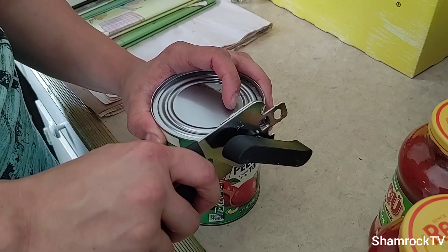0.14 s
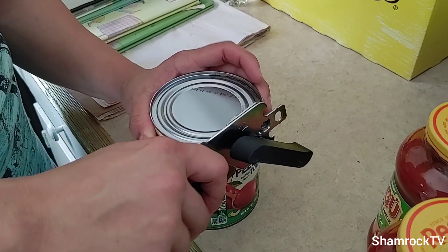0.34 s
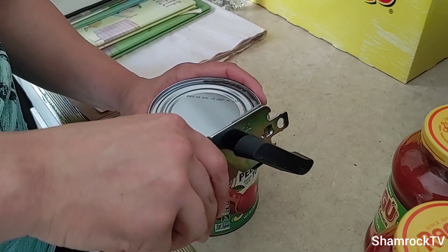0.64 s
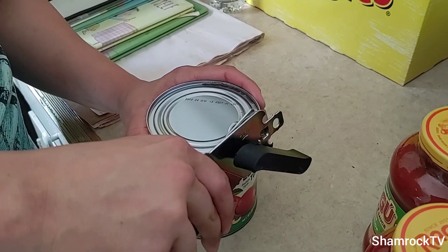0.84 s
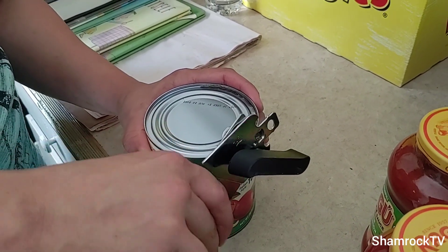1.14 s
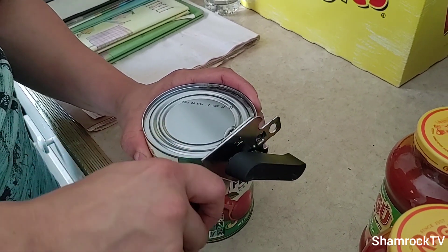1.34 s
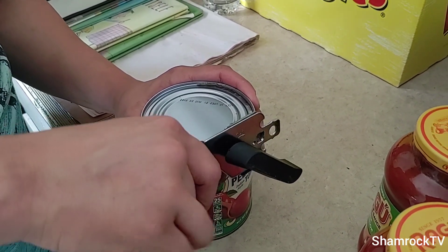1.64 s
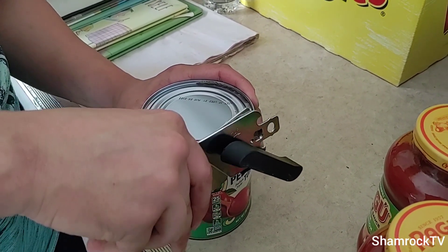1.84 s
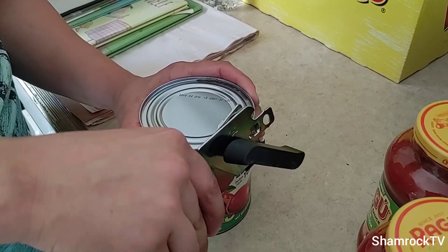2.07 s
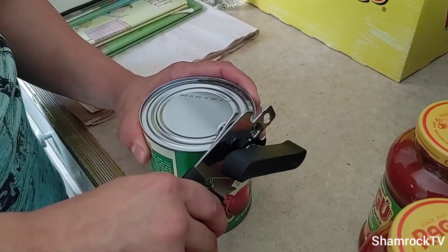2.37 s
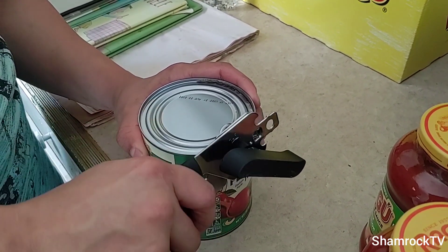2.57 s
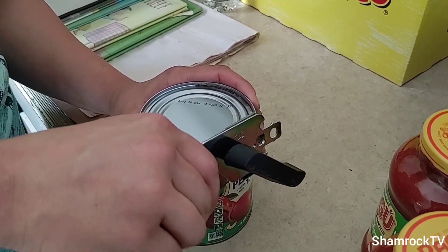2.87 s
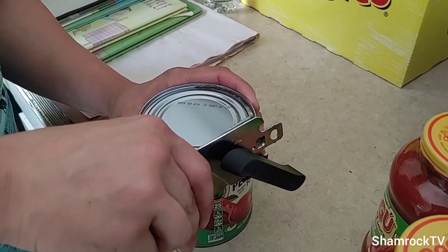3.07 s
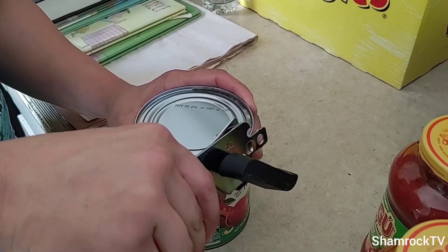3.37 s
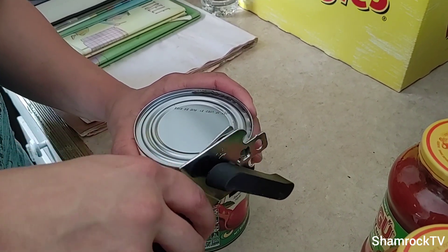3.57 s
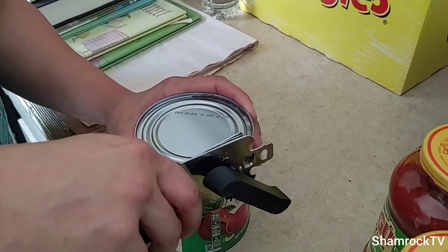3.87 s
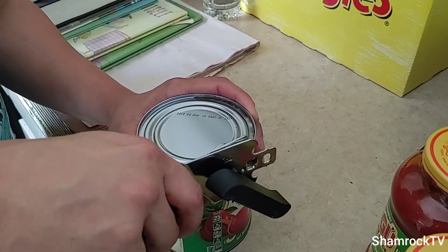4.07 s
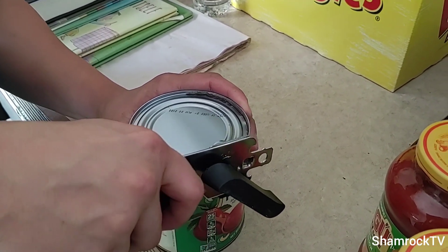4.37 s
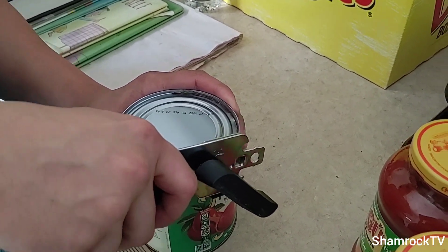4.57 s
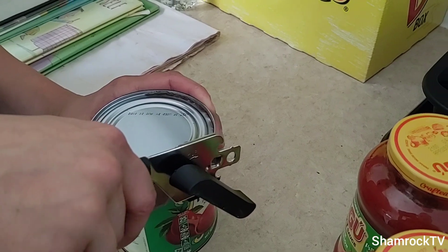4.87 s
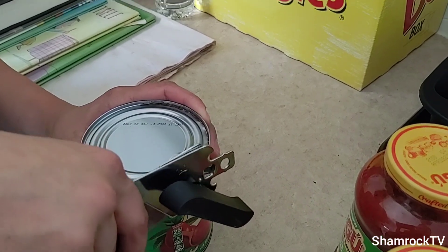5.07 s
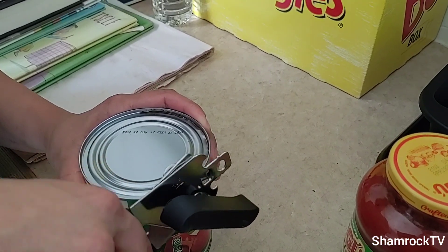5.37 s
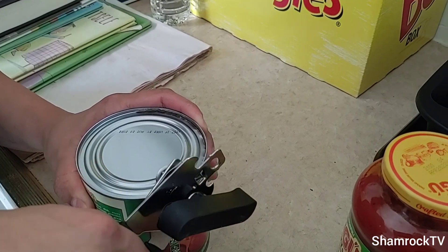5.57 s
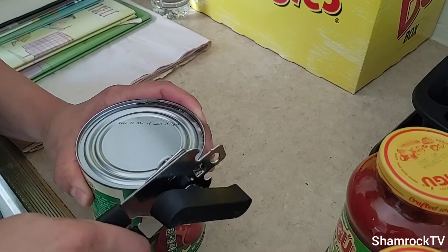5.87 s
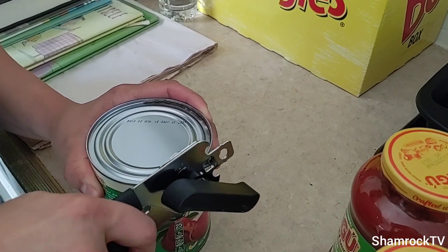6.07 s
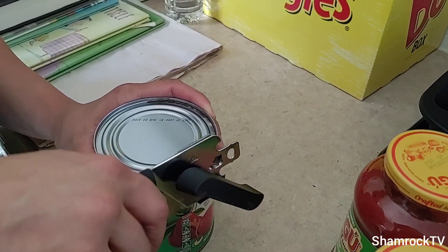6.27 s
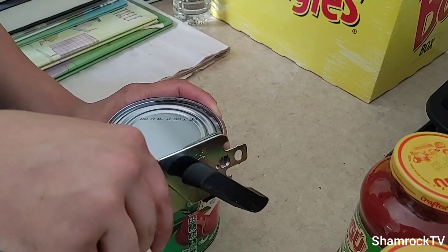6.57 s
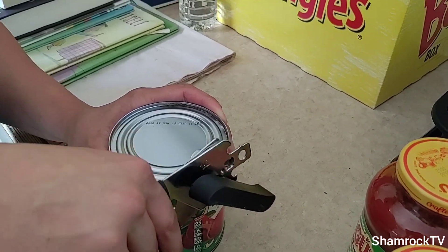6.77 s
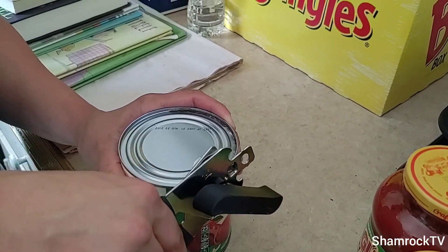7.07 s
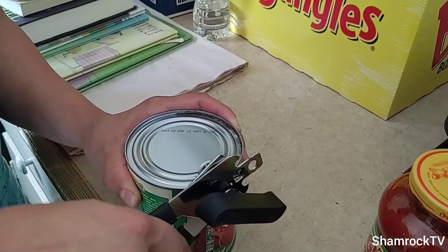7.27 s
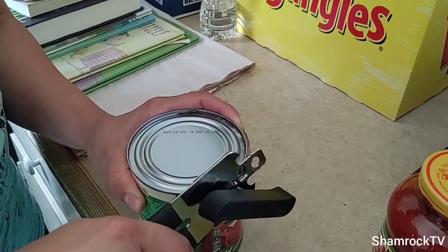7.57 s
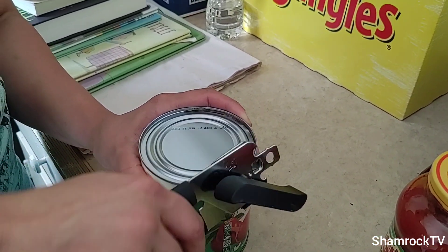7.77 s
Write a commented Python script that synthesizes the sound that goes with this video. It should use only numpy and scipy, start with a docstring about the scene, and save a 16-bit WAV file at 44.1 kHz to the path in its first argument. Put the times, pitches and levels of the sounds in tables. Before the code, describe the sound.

Close stereo pickup of a manual can opener on a full tin in a quiet kitchen. Small metal ticks and grainy scrapes come with each wrist turn; then a loud snap with a short crunch of tearing tin, followed by three more strong snaps almost two seconds apart. The can drops back with dull thuds. Two thin squeaks rise, and a faint hum lies underneath.

```python
"""Hand can opener on a full tin

A hand can opener is cranked round a full tin on a kitchen counter, heard close up over a humming appliance.
Snaps, ticks and landings are noise bursts that ring the modes of the can and echo in the room; thumps are decaying sines.
Wheel and fingers rub as grainy noise under bell-shaped swells, the first snap tears on as coarse noise,
and two thin squeaks are gliding sine partials. Air is shaped noise; hum and whine are unsteady sines."""
import sys
import numpy as np
from scipy import signal
from scipy.fft import rfft, irfft, next_fast_len
from scipy.io import wavfile
from scipy.ndimage import map_coordinates

SR = 44100
rng = np.random.default_rng(int(sys.argv[2]) if len(sys.argv) > 2 else 0)


def materialize(psi):
    """Save the field psi as 16-bit PCM at rate SR to the path in sys.argv[1].

    A 1-D psi becomes a single channel; in a 2-D psi each row is a channel.
    """
    bounded = np.clip(np.atleast_2d(psi).T, -1, 1)
    quanta = np.round(bounded * 32767).astype(np.int16)
    wavfile.write(sys.argv[1], SR, quanta)


N = 349272


def amp(db):
    """Decibels to gain."""
    return 10 ** (np.asarray(db) / 20)


def unit(x):
    """Scaled to rms 1."""
    return x / np.sqrt(np.mean(x ** 2) + 1e-20)


def along(points, hz):
    """(Hz, value) points read on a log frequency axis."""
    f, v = np.transpose(points)
    return np.interp(np.log(hz + 1), np.log(f + 1), v)


def curves(rows):
    """One value per sample for each column after the time."""
    s, *columns = np.transpose(rows)
    return [np.interp(np.arange(N) / SR, s, column) for column in columns]


def wobble(rate):
    """A smooth random curve, rate knots a second."""
    knots = rng.standard_normal(int(N * rate / SR) + 4)
    return map_coordinates(knots, [np.arange(N) * rate / SR])


def filtered(x, response):
    """x shaped by a gain that depends on frequency."""
    m = next_fast_len(N + SR // 4)
    spectrum = rfft(x, m) * response(np.fft.rfftfreq(m, 1 / SR))
    return irfft(spectrum, m)[..., :N]


def band(x, low_hz, high_hz, order=3):
    """Causal band-pass."""
    edges = np.clip([low_hz, max(high_hz, low_hz + 10)], 10, SR / 2 - 10)
    return signal.sosfilt(signal.butter(order, edges, "band", fs=SR, output="sos"), x)


def rush(spectrum, alike, grain_db):
    """Stereo noise of rms 1 in uneven grains; mid and side are balanced for the wanted left-right likeness."""
    def turn(hz):
        return np.arccos(np.clip(along(alike, hz), -1, 1)) / 2

    pair = rng.standard_normal((2, N)) * amp(grain_db * wobble(700))
    mid, side = filtered(pair, lambda hz: amp(along(spectrum, hz)) * [np.cos(turn(hz)), np.sin(turn(hz))])
    return unit(np.array([mid + side, mid - side]))


def swells(rows):
    """A gain that rises and falls in a bell for each (centre s, level dB, half length s)."""
    t = np.arange(N) / SR
    gain = np.zeros(N)
    for s, db, half in rows:
        near = slice(*np.searchsorted(t, [s - 4 * half, s + 4 * half]))
        gain[near] += amp(db) * np.exp(-((t[near] - s) / half) ** 2)
    return gain


def add(track, sound, s):
    """Mix a stereo sound in from time s."""
    start = max(round(s * SR), 0)
    track[:, start:start + sound.shape[1]] += sound[:, :max(N - start, 0)]


# Tone of the room air. Each row: frequency in Hz, relative density in dB per Hz.
AIR_SPECTRUM = [(12, -31.5), (20, -11.5), (113, -1.5), (134, 2), (187, -6.5), (248, -2.5), (328, -8),
                (410, -7.5), (802, -18.5), (2320, -27.5), (4670, -25.5), (5080, -23.5), (9950, -33),
                (14700, -33.5), (16000, -40.5)]
# Stereo width of the air. Each row: frequency in Hz, left-right likeness (1 is mono).
AIR_LIKENESS = [(30, .3), (70, 0.89), (130, 0.38), (250, 0.86), (950, .1), (4000, 0.045)]
# Partials of the appliance hum. Each row: frequency in Hz, rms level in dB.
HUM_PARTIALS = [(59.5, -77), (119.5, -73.5), (237.5, -75)]
# Swells of the thin whine. Each row: centre in seconds, level in dB, half length in seconds.
WHINE_BELLS = [(1.17, -87, 0.091), (5.2, -84, 0.29), (6.55, -84.5, .5)]
WHINE_HZ, WHINE_DB = 5000, -90.5  # its pitch and its level between swells


def kitchen():
    """Room air as shaped noise; the appliance's hum and whine are sines with wandering phase."""
    t = np.arange(N) / SR
    hum = sum(amp(db) * unit(np.sin(2 * np.pi * hz * t + .5 * wobble(11))) for hz, db in HUM_PARTIALS)
    loudness = (amp(WHINE_DB) + swells(WHINE_BELLS)) * amp(1.5 * wobble(8.5))
    whine = loudness * np.sin(2 * np.pi * WHINE_HZ * t + 0.48 * wobble(100))
    air = amp(-66.5) * rush(AIR_SPECTRUM, AIR_LIKENESS, grain_db=-0.5)
    return hum + whine + air


# Wheel rolling along the rim, once for each turn of the wrist.
# Each row: time of full speed in seconds, scrape level in dB, half length in seconds.
WHEEL_TURNS = [(.5, -72.5, 0.38), (1.6, -83, .3), (2.85, -73.5, .3), (3.55, -70, .11), (4.8, -70, 0.28),
               (6.22, -69.5, 0.17), (7.12, -84, 0.18), (7.8, -67, 0.16)]
# Brief slides of skin and steel.
# Each row: centre in seconds, scrape level in dB, hiss level in dB, half length in seconds.
BRIEF_SLIDES = [(.338, -84, -65, .022), (.483, -65, -58, 0.035), (.514, -77, -46.5, 0.02),
                (.556, -63, -54, .025), (.882, -60.5, -68, 0.014), (1.237, -64.5, -67.5, 0.021),
                (1.434, -66, -71, .034), (1.485, -52.5, -89, 0.013), (1.634, -69.5, -68, 0.03),
                (1.808, -66.5, -65, 0.031), (1.925, -57, -63, 0.016), (1.965, -65, -61, 0.013),
                (2.43, -58, -57.5, 0.018), (2.614, -67.5, -73, .04), (2.877, -71, -63, 0.028),
                (3.296, -52, -56, .015), (3.346, -57.5, -58.5, 0.023), (3.762, -63, -54, 0.031),
                (4.323, -71.5, -77, .055), (4.761, -73, -67.5, 0.024), (4.835, -51, -50, 0.015),
                (5.091, -75, -72.5, 0.043), (5.506, -72, -74.5, 0.0291), (5.743, -60, -62, .016),
                (6.284, -71, -64.5, 0.043), (6.713, -61.5, -70, .021), (6.98, -65.5, -65.5, .013),
                (7.064, -79, -66.5, 0.022), (7.862, -46.5, -66, 0.0094), (7.91, -83, -54.5, 0.072)]
# Tone of steel on steel. Each row: frequency in Hz, relative density in dB per Hz.
SCRAPE_SPECTRUM = [(300, -18), (1200, -8), (2300, -10.5), (2750, -0.5), (3050, -6), (3350, -1), (3700, -4),
                   (4050, -1), (4600, -5), (5600, -7.5), (8000, -9.5), (16000, -35)]
# Tone of skin on the crank. Each row: frequency in Hz, relative density in dB per Hz.
HISS_SPECTRUM = [(2000, -33.5), (5500, -8.5), (7500, -1), (9300, 2), (12000, -5.5), (16000, -16)]
RESTING_SCRAPE_DB, RESTING_HISS_DB = -91, -82  # the hand at rest
TURN_HISS_DB = -1.5  # relative to a turn's scrape
TICK_SLIDE_DB, TICK_SLIDE_S = -38, 0.016  # rub around every tick: level relative to it, half length
# fingers shift at random: mean count per second is fixed, scrape level with its spread either way, half length
BRUSHES_PER_S, BRUSH_DB, BRUSH_SPREAD_DB, BRUSH_S = 3.3, -83.5, 2.5, .025


def rubbing():
    """The wheel scrapes along the rim and skin slides over the crank: two grainy noises under bell-shaped swells."""
    rolling = swells(WHEEL_TURNS)
    unsteady = amp(1.4 * wobble(22))
    catching = unit(amp(2.2 * wobble(150) + 3 * wobble(500)))  # a sliding contact sticks and lets go

    chances = rng.random((round(BRUSHES_PER_S * N / SR), 2))
    brushes = [(when * N / SR, BRUSH_DB + BRUSH_SPREAD_DB * (2 * size - 1), BRUSH_S)
               for when, size in chances]
    tick_slides = [(s, db + TICK_SLIDE_DB, TICK_SLIDE_S) for s, db, *_ in TICK_KNOCKS]
    small = swells(brushes + tick_slides)
    scrape_slides = swells([(s, db, half) for s, db, _, half in BRIEF_SLIDES])
    hiss_slides = swells([(s, db, half) for s, _, db, half in BRIEF_SLIDES])

    scrape = unsteady * (amp(RESTING_SCRAPE_DB) + rolling)
    scrape = scrape + catching * (small + scrape_slides)
    hiss = unsteady * (amp(RESTING_HISS_DB) + amp(TURN_HISS_DB) * rolling)
    hiss = hiss + catching * (amp(-3.5) * small + hiss_slides)

    # both lean right, the skin more than the steel
    steel = scrape * rush(SCRAPE_SPECTRUM, [(3000, 0.16)], grain_db=2.0) * amp([[-3.5], [-.5]])
    skin = hiss * rush(HISS_SPECTRUM, [(8000, 0.097)], grain_db=1.5) * amp([[-5.5], [1]])
    return steel + skin


# Can, lid and opener ringing together.
# Each row: nominal frequency in Hz, nominal level in dB, time to fall 60 dB in seconds.
CAN_MODES = [(165.4, -6.5, 0.55), (250, -4, 0.056), (379.6, 0.5, 0.11), (550, -1, 0.09), (865, 0, 0.036),
             (929, 1.5, 0.092), (1105, 3, 0.13), (1364, 1.5, 0.087), (1588, -5.5, 0.08), (2000, -4, 0.041),
             (2410, 0, .06), (2720, -2, 0.092), (2810, -3, 0.074), (3280, -3.5, 0.055), (3890, -1, 0.057),
             (5846, 2, 0.094), (7850, 4, 0.055), (8540, -2, 0.063)]
# Registers of a contact, in the order thud, clank, ring, crack.
# Each row: low edge in Hz, high edge in Hz, trim in dB, share of the treble pan, unlikeness of the two sides,
# room level in dB, room time to fall 60 dB in seconds.
CONTACT_REGISTERS = [(169, 674, 2, 0.016, 0.5, -6, 0.23), (790, 2620, -5, 0.0082, 0.84, -5, 0.14),
                     (2210, 5200, -8.5, 0.92, 1, -12, 0.16), (6300, 10730, 1.5, 1.1, 1, -9, 0.13)]
MODE_DRIFT, MODE_SPREAD_DB = .008, 2  # the grip shifts each mode's pitch (share) and level at every contact


def contact(levels_db, centres, pan_db, rise, fade, ring_db, grain_db, fizz_db):
    """Tiny fractures swell and fade, ring the can and echo in the kitchen; returns the sound and its lead time."""
    t = np.arange(SR // 3) / SR
    lead = 3.2 * max(rise, 1e-4)
    swell = np.exp(-np.maximum((lead - t) / max(rise, 1e-4), (t - lead) / max(fade, 1e-4)))
    steps = np.repeat(rng.standard_normal(len(t)), 20)[:len(t)]  # each grain lasts 20 samples
    grains = swell * amp(grain_db * steps)

    def ringing(x, tail):
        return signal.fftconvolve(x, tail, axes=-1)[..., :len(t)]

    # every blow finds the modes at new pitches and strengths
    hz, db, t60 = np.transpose(CAN_MODES)[:, :, None]
    hz = hz * (1 + MODE_DRIFT * rng.standard_normal(hz.shape))
    db = db + MODE_SPREAD_DB * rng.standard_normal(db.shape)
    modes = np.sum(amp(db - 60 * t / t60) * np.cos(2 * np.pi * hz * t), axis=0)

    shared = grains * rng.standard_normal((1, len(t)))
    own = grains * rng.standard_normal((2, len(t)))
    out = np.zeros((2, len(t)))
    for level_db, centre, register in zip(levels_db, centres, CONTACT_REGISTERS):
        low_hz, high_hz, trim_db, pan_share, unlike, room_db, room_t60 = register
        force = shared + unlike * own
        direct = unit(band(force + amp(ring_db) * ringing(force, modes[None]), low_hz, high_hz))
        if centre:  # the grip and the place of the wheel favour one resonance: (Hz, width share, dB)
            centre_hz, width, centre_db = centre
            favoured = band(direct, centre_hz / (1 + width), centre_hz * (1 + width), order=1)
            direct = direct + amp(centre_db) * unit(favoured)
        if register == CONTACT_REGISTERS[-1]:  # the finest fractures fizz above the crack
            direct = direct + amp(fizz_db) * unit(band(force, high_hz, 16000))
        echoes = rng.standard_normal(len(t)) + 2 * unlike * rng.standard_normal((2, len(t)))
        walls = echoes * amp(-60 * t / room_t60) * (1 - np.exp(-t / 0.0063))
        heard = unit(unit(direct) + amp(room_db) * unit(ringing(direct, walls)))
        sides = amp(np.array([[.5], [-.5]]) * pan_db * pan_share)
        out += amp(level_db + trim_db) * heard * sides / sides.mean()
    return out, lead


# Steel parts knocking and catching, levels before the trims.
# Each row: nominal time in seconds, ring level in dB, thud and crack in dB relative to the ring,
# ring frequency in Hz, treble left minus right in dB before each register's share.
TICK_KNOCKS = [(0.0336, -56.5, -3, -16, 3300, -10), (0.157, -37.5, -5, -12, 2600, -4),
               (0.2541, -35.5, -20, -24, 2700, -3), (0.291, -26.5, -25, -11.5, 2870, -4.5),
               (0.4872, -32, -29, -13, 3140, -1.5), (0.4951, -41.5, -16, 1, 2680, -10),
               (0.5105, -50.5, -9, 12.5, 6550, -11), (0.5696, -46, -18.5, -27, 2730, 1),
               (0.6358, -48, -16.5, -12, 2800, -2), (1.3052, -51, -1.5, -11.5, 4200, -3),
               (1.3869, -65, 8.5, -8.5, 3490, -8), (1.443, -54.5, 0.5, -13, 6340, -12),
               (1.4836, -35, -18, -40, 2720, -0.5), (1.7484, -34, -29.5, -3, 4970, -7),
               (1.783, -46.5, -19, -7, 4850, -3.5), (1.926, -46.5, -7.5, -6.5, 3220, -3.5),
               (2.039, -55, 5, -24, 3200, -3), (2.9379, -41, -28, -10.5, 4000, -4.5),
               (2.9833, -36.5, -29, -6.5, 4240, -4), (3.199, -62.5, -28, 8, 4170, -7.5),
               (3.2985, -42, -6.5, -3, 2880, -12.5), (3.3977, -57, 6.5, -20, 2500, -12),
               (3.4938, -35.5, -4.5, -14, 4730, -4.5), (3.6036, -56, -4.5, -8.5, 3290, 0),
               (3.766, -54.5, -4, 9, 6020, -10), (4.1837, -69, 10, -4, 2570, -2),
               (4.831, -39, -15.5, 0, 4900, -9.5), (4.996, -46.5, -13, 0, 5160, -6),
               (5.667, -60.5, -29, 6.5, 6020, -6.5), (5.7516, -48, -23, -5.5, 5880, -2.5),
               (6.566, -48.5, -21, -9, 2810, -4), (7.0163, -51.5, -25.5, 6.5, 6280, -7),
               (7.0485, -57.5, -29.5, 11.5, 4990, -4), (7.247, -49, -21, -3, 4500, -6.5),
               (7.2729, -42.5, -4.5, -17.5, 2790, -3), (7.3314, -52.5, -28, -3, 4410, -5.5),
               (7.4606, -53, -7.5, -15, 2950, -3.5)]
TICK_RISE_S, TICK_FADE_S = .001, 0.0039
CLANK_SHARE, CLANK_DB = 0.45, -20.5  # a heavier knock clanks more: dB per dB of thud, trim
TICK_THUD_HZ, THUD_SCATTER = 616, 0.048  # the knock of the can; it shifts with the grip (share)
FIZZ_DB, FIZZ_PER_CRACK = -8.5, .35  # sharper ticks fizz more: trim, dB per dB of crack


def ticks():
    """The loose crank and handles knock as the hand lets go and grips again: short, light contacts."""
    out = np.zeros((2, N))
    for s, db, thud_db, crack_db, ring_hz, pan_db in TICK_KNOCKS:
        levels_db = db + np.array([thud_db - 16, CLANK_SHARE * thud_db + CLANK_DB, -18, crack_db - 22])
        fizz_db = FIZZ_DB + FIZZ_PER_CRACK * crack_db
        thud_hz = TICK_THUD_HZ * np.exp(THUD_SCATTER * rng.standard_normal())
        centres = [(thud_hz, .45, -3), None, (ring_hz, .05, -4), None]
        sound, lead = contact(levels_db, centres, pan_db, TICK_RISE_S, TICK_FADE_S,
                              ring_db=-45, grain_db=1.73, fizz_db=fizz_db)
        add(out, sound, s + 0.0028 - lead)  # the peak falls 2.8 ms after the nominal time
    return out


# Two squeaks of the dry wheel, one list of glide points each.
# Each row: time in seconds, pitch in Hz before jitter, level in dB before the partials and pan.
SQUEAK_GLIDES = [
    [(2.25, 6070, -100), (2.32, 6600, -88), (2.40, 7400, -77), (2.44, 7900, -105)],
    [(4.38, 7300, -105), (4.46, 7850, -80), (4.61, 8510, -84), (4.66, 9200, -78), (4.80, 10130, -71),
     (4.92, 9790, -70), (4.99, 9420, -71), (5.03, 9330, -110)],
]
# Partials of a squeak, as ratios to its pitch.
PARTIAL_RATIOS = [1, .83, .405]
# Relative levels of those partials, in dB before their flutter.
PARTIAL_DB = [0, -9, -11]


def squeak():
    """Dry friction tones: jittering sine partials glide with the drawn pitch, leaning right."""
    hz, level_db = curves([point for glide in SQUEAK_GLIDES for point in glide])
    phase = 2 * np.pi * np.cumsum(hz * (1 + .0045 * wobble(400))) / SR
    tones = sum(amp(db + 2.3 * wobble(40)) * np.sin(ratio * phase)
                for ratio, db in zip(PARTIAL_RATIOS, PARTIAL_DB))
    return amp(level_db) * tones * amp([[-3], [3]])


def thump(hz, t60):
    """The whole can rocks for a few cycles on the counter: a decaying sine, alike on both sides."""
    t = np.arange(SR // 4) / SR
    rocking = band(np.sin(2 * np.pi * hz * t) * amp(-60 * t / t60), hz / 2.5, hz * 3.0, order=2)
    return unit(np.array([rocking, rocking]))


# Wheel breaking through the lid, levels before the trims.
# Each row: time in seconds, ring level in dB, thud, clank and crack in dB relative to the ring,
# thud frequency in Hz, ring frequency in Hz, treble left minus right in dB before each register's share,
# fade in seconds.
SNAP_BREAKS = [(2.680, -16, -11.5, -11.5, -13, 450, 4030, -6.5, .0031),
               (2.7382, -22, -18.5, -20.5, -15, 262, 2750, -6, .004),
               (4.4858, -11.5, -12.5, -14, -10, 550, 6300, -14, .0049),
               (4.4894, -13, -9.5, -4, -12, 541.5, 2932, -6.5, .0032),
               (6.090, -8, -10.5, -13, -11.5, 476, 5846, -7.5, .005),
               (6.0917, -10.5, -15.5, -12.5, -18, 240, 2410, -2.5, .004),
               (7.680, -7, -12.5, -15.5, -17, 239, 3670, -5.5, 0.0051),
               (7.869, -33, 0.5, -4, -16.5, 334, 3280, -10.5, 0.0059)]
SNAP_RISE_S = .0017  # the fractures swell
SNAP_THUMP_DB, SNAP_THUMP_T60_S = -20, .085  # the can rocks: trim on the thud's table level, decay


def snaps():
    """The wheel breaks through the lid in a burst of fractures and the jolted can thumps."""
    out = np.zeros((2, N))
    for s, db, thud_db, clank_db, crack_db, thud_hz, ring_hz, pan_db, fade in SNAP_BREAKS:
        levels_db = db + np.array([thud_db - 17.5, clank_db - 13.0, -19.5, crack_db - 20.5])
        centres = [(thud_hz, .25, -1), None, (ring_hz, .03, -4), None]
        sound, lead = contact(levels_db, centres, pan_db, SNAP_RISE_S, fade,
                              ring_db=-46.5, grain_db=4, fizz_db=-10.5)
        add(out, sound, s - lead)
        add(out, amp(db + thud_db + SNAP_THUMP_DB) * thump(thud_hz, SNAP_THUMP_T60_S), s)
    return out


# Tone of the tearing tin. Each row: frequency in Hz, relative density in dB per Hz.
TEAR_SPECTRUM = [(59, -51.5), (100, -31), (266, -0.5), (691, -11.5), (891, -9.5), (1130, -16),
                 (2130, -24.5), (2750, -8), (5190, -20.5), (7940, -17), (16000, -42)]
TEAR_S, TEAR_DB = 2.68, -40.5  # the lid tears on from the first snap
TEAR_ATTACK_S, TEAR_HOLD_S, TEAR_FALL_DB_PER_S = .014, 0.049, 750


def tearing():
    """The tin gives way in a short, coarse crunch of grainy noise."""
    t = np.arange(N) / SR - TEAR_S
    attack = np.clip(t / TEAR_ATTACK_S, 0, 1) ** 2
    fall_db = TEAR_FALL_DB_PER_S * np.maximum(t - TEAR_ATTACK_S - TEAR_HOLD_S, 0)
    crunch = rush(TEAR_SPECTRUM, [(300, 1.0), (4000, 0.99)], grain_db=5.5)
    return attack * amp(TEAR_DB - fall_db) * crunch


# Jolted can landing on the counter again.
# Each row: time in seconds, thud level in dB before its register's trim, thud frequency in Hz.
CAN_LANDINGS = [(2.729, -57, 540), (4.498, -33, 355), (4.538, -51.5, 364.5), (4.577, -56, 535),
                (6.141, -53.5, 349), (7.732, -52.5, 235)]
LANDING_CLANK_DB, LANDING_THUMP_DB = -4.5, -3  # relative to the thud's table level
COUNTER_HZ, COUNTER_DB, COUNTER_T60_S = 95, -67, 0.16  # the counter booms under every landing


def landings():
    """The can drops back with a dull thud and clank, and the counter booms as a low decaying sine."""
    out = np.zeros((2, N))
    for s, db, thud_hz in CAN_LANDINGS:
        sound, lead = contact([db, db + LANDING_CLANK_DB], [(thud_hz, .25, -1), None], 0,
                              rise=.002, fade=.0033, ring_db=-48.5, grain_db=2.5, fizz_db=0)
        add(out, sound, s - lead)
        add(out, amp(db + LANDING_THUMP_DB) * thump(thud_hz, t60=.08), s)
        add(out, amp(COUNTER_DB) * thump(COUNTER_HZ, COUNTER_T60_S), s)
    return out


def scene():
    """The opener at work in the quiet kitchen."""
    return kitchen() + rubbing() + ticks() + squeak() + snaps() + tearing() + landings()


TOP_HZ, TOP_STEEPNESS = 16100, 90  # upper band limit


def record(dry):
    """Two channels whose stereo width narrows around 140 Hz, cut off steeply at the band limit."""
    mid, side = (dry[0] + dry[1]) / 2, (dry[0] - dry[1]) / 2
    width_db = [(50, 1.5), (140, -6.5), (400, -2.5), (700, 1), (6000, 1.5)]  # (Hz, side gain dB)
    side = filtered(side, lambda hz: amp(along(width_db, hz)))
    stereo = np.array([mid + side, mid - side])
    return filtered(stereo, lambda hz: 1 / (1 + (hz / TOP_HZ) ** TOP_STEEPNESS))


dry = scene()
out = record(dry)
materialize(out)
```